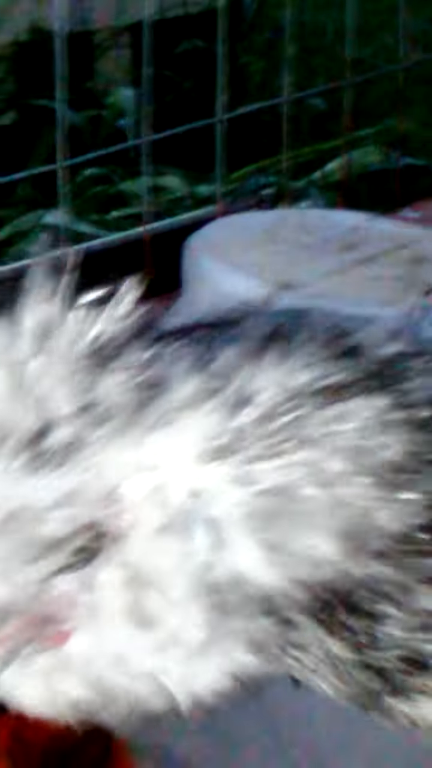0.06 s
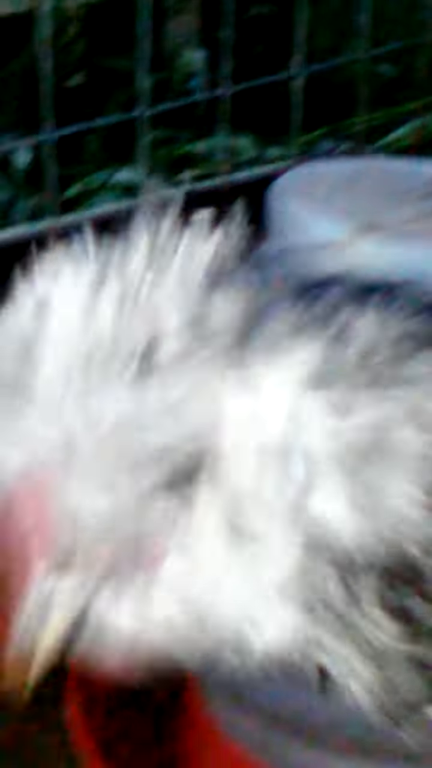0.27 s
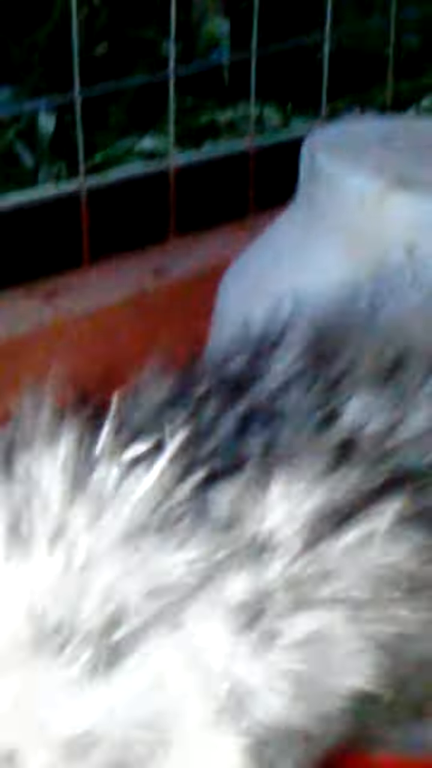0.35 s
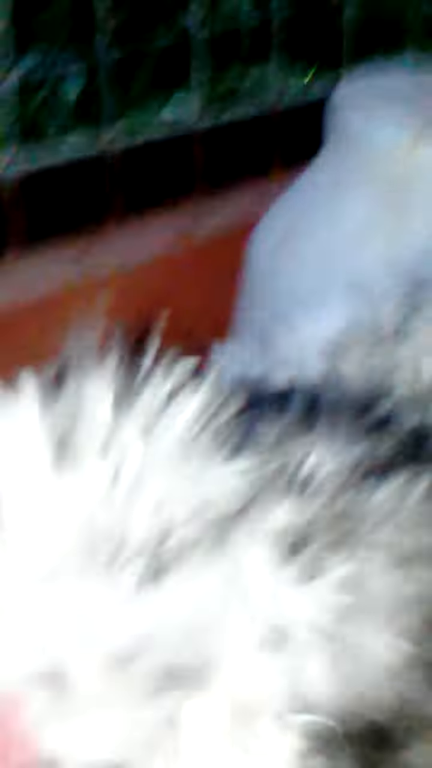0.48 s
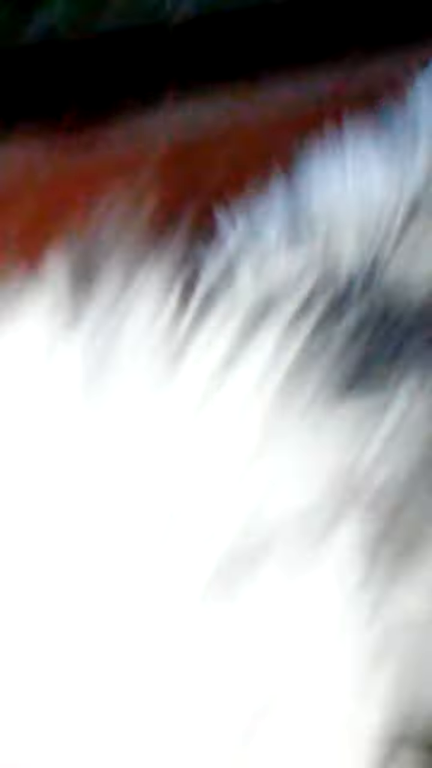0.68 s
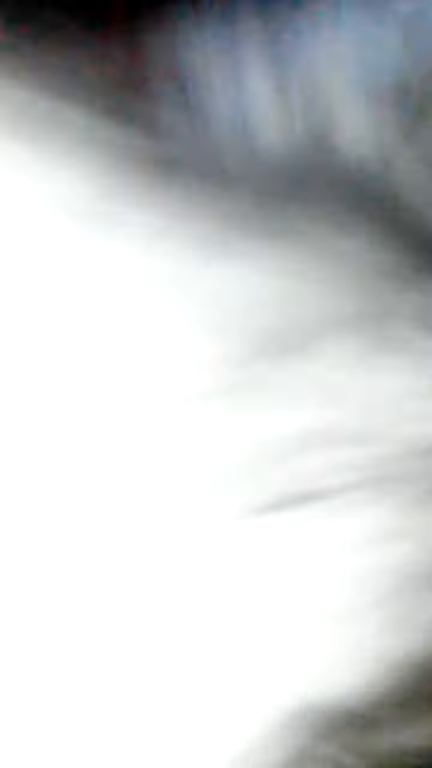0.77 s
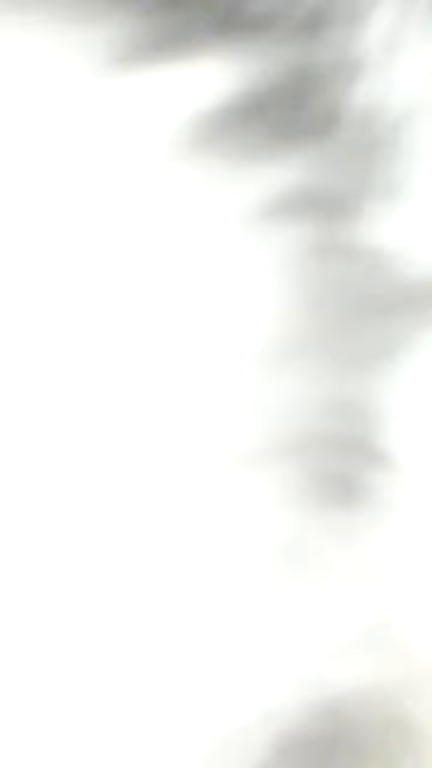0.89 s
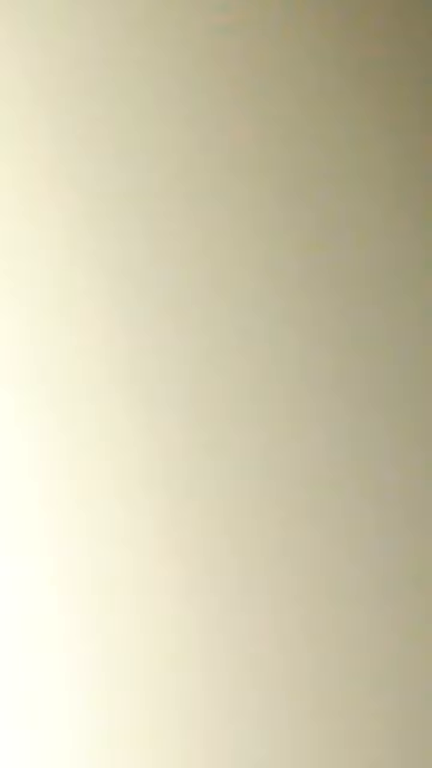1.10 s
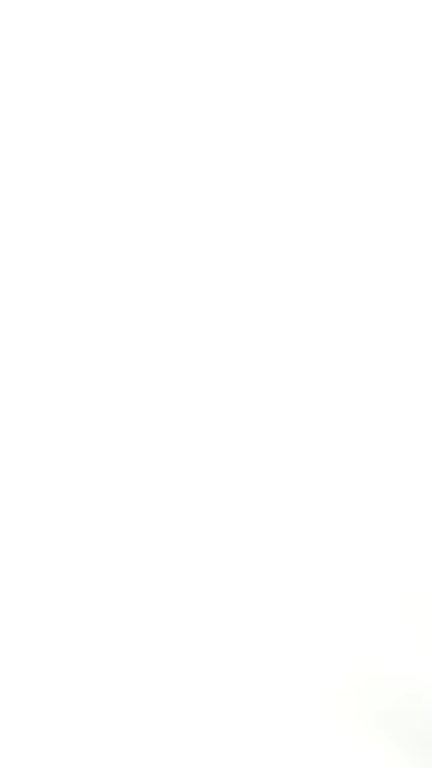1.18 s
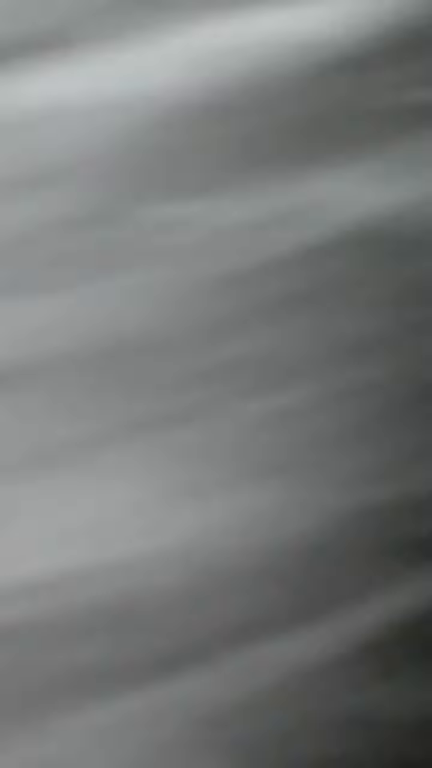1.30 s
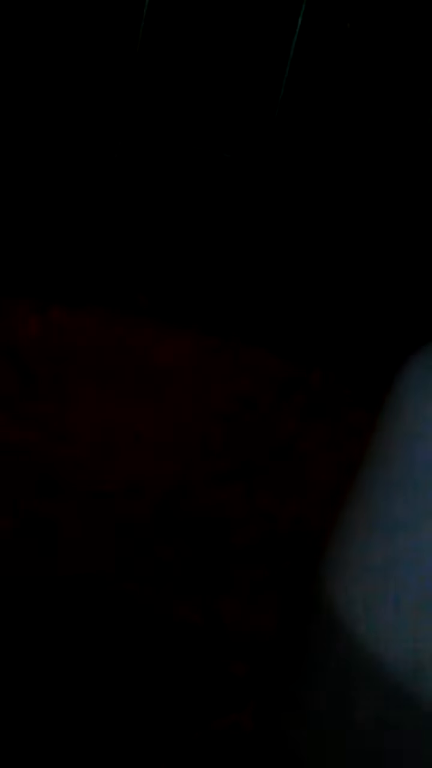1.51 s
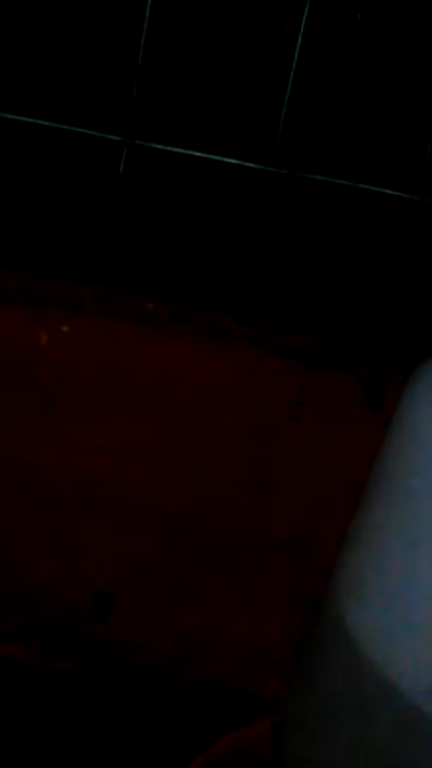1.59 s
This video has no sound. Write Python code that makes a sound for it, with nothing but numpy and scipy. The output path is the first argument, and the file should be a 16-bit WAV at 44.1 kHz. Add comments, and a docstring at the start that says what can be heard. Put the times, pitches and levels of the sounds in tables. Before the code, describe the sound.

Close hen clucks, low and brief, with soft crooning, small bird chirps, taps and a scrape

```python
"""Hen clucking in an outdoor pen

A hen clucks low and short close to a phone and ends on a harsher, higher call: pulses ring a throat.
Another hen croons in soft harmonic tones; small birds further off whistle falling chirps (gliding sines).
Feathers brush the phone (grainy noise) and scrape it once (ringing modes); beaks and feet tap (dull clicks).
A thin shimmer near 4 kHz, outdoor air and microphone hiss, all filtered noise, lie underneath.
"""
import sys
import numpy as np
from scipy import signal
from scipy.fft import rfft, irfft
from scipy.io import wavfile
from scipy.ndimage import uniform_filter1d

SR = 44100
rng = np.random.default_rng(int(sys.argv[2]) if len(sys.argv) > 2 else 0)


def boost_factor(decibels):
    """Convert a level in decibels to a linear amplitude factor."""
    exponent = np.asarray(decibels, float) / 20
    return 10 ** exponent


def put_to_file(sound):
    """Save the sound as 16-bit audio at rate SR, in the file named by the first command-line argument."""
    columns = np.atleast_2d(sound).T  # one column per channel
    safe = np.clip(columns, -1, 1)
    whole_steps = np.round(safe * 32767)
    wavfile.write(sys.argv[1], SR, whole_steps.astype(np.int16))


N = 72765


def line(table, col=1):
    """A table column joined by straight lines in time."""
    rows = np.array(table, float)
    return np.interp(np.arange(N) / SR, rows[:, 0], rows[:, col])


def inside(table, fade_s=0.0026):
    """1 between the first and last row, with short fades; 0 elsewhere."""
    t = np.arange(N) / SR
    to_edge_s = np.minimum(t - table[0][0], table[-1][0] - t)
    return np.clip(to_edge_s / fade_s, 0, 1)


def unit(x):
    """Scales to rms 1."""
    return x / np.sqrt(np.mean(x ** 2) + 1e-18)


def ring(x, hz, width_hz):
    """One resonance, gain near 1 at its centre."""
    return signal.lfilter(*signal.iirpeak(hz, hz / width_hz, SR), x)


def ring_twice(x, hz, width_hz):
    """The same resonance passed twice, for steeper skirts."""
    return ring(ring(x, hz, width_hz), hz, width_hz)


def coloured(points, lo_hz=20, hi_hz=2e4):
    """Noise shaped by (Hz, relative dB) points; rms 1 within lo_hz-hi_hz."""
    curve = np.array(points, float)
    hz = np.arange(N // 2 + 1) * SR / N + 1
    shape_db = np.interp(np.log(hz), np.log(curve[:, 0]), curve[:, 1])
    spectrum = rfft(rng.standard_normal(N)) * boost_factor(shape_db)
    in_band = irfft(spectrum * (hz > lo_hz) * (hz < hi_hz), N)
    return irfft(spectrum, N) / np.std(in_band)


def walk(rate_hz):
    """Slow random wander, rms 1."""
    size = int(SR / rate_hz)
    return unit(uniform_filter1d(uniform_filter1d(rng.standard_normal(N), size), size))


def tail(x, t60_s):
    """Scattered echoes dying away: convolution with decaying noise of unit energy."""
    t = np.arange(SR // 2) / SR
    echoes = rng.standard_normal(len(t)) * boost_factor(-60 * t / t60_s) * np.minimum(t / 0.0013, 1)
    return signal.fftconvolve(x, echoes / np.sqrt(np.sum(echoes ** 2)))[:N]


def late(x, delay_s):
    """The same sound, delay_s later."""
    return np.pad(x, (int(delay_s * SR), 0))[:N]


def whistle(rows):
    """A sine that follows a table of pitch and rms level."""
    phase = 2 * np.pi * np.cumsum(line(rows)) / SR
    return np.sqrt(2) * np.sin(phase) * boost_factor(line(rows, 2)) * inside(rows, 0.0027)


def outdoor_air():
    """Steady noise: the spectrum of outdoor air plus microphone hiss."""
    # Each row of both: frequency in Hz, relative density in dB.
    air_colour = [(15, -37), (25, -13), (189, -0.5), (458, -2), (646, -7.5), (893, -2), (1260, -10),
                  (1340, -7.5), (1430, -1.5), (1560, -10), (2020, -6.5), (2620, -7), (2800, -7.5),
                  (3180, -11.5), (3540, 1), (4030, -2.5), (4300, -28), (5590, -57.5), (9460, -120)]
    hiss_colour = [(2590, -54), (4400, -15.5), (4520, -24), (5270, -21.5), (6410, -2.5), (7080, -4),
                   (7960, -0.5), (8390, -5), (8890, -13), (10400, -14), (15600, -14.5)]
    air_db, hiss_db = -52.5, -63
    return boost_factor(air_db) * coloured(air_colour) + boost_factor(hiss_db) * coloured(hiss_colour)


def thin_shimmer():
    """Noise through a broad double resonance, its level wavering."""
    # Mean level. Each row: time in seconds, level in dB.
    level_rows = [(0.0, -70), (0.55, -75.5), (0.642, -52.5), (0.762, -70.5), (0.904, -47), (1.046, -55.5),
                  (1.12, -50.5), (1.268, -54), (1.65, -59)]
    centre_hz, width_hz = 3765, 1700
    band = unit(ring_twice(rng.standard_normal(N), centre_hz, width_hz))
    waver_db = 0.9 * walk(21)
    return band * boost_factor(line(level_rows) + waver_db)


def birds():
    """Falling whistles smeared by echoes among trees, and a few thin faraway notes without echo."""
    # One table a chirp. Each row: time in seconds, pitch in Hz, level in dB before flutter and echoes.
    chirps = [
        [(0.016,3050,-51),(.024,2900,-42.5),(.034,2370,-38.5),(.058,2206,-39.5)],
        [(.07,2570,-42),(.09,2530,-48),(.102,2300,-44),(.128,1896,-40)],
        [(.11,2722,-42),(.135,2450,-45),(.147,2270,-34),(.155,2150,-39)],
        [(.128,2963,-39),(.145,2885,-41.5),(.183,2482,-29.5),(.204,2030,-35)],
        [(.195,3260,-47.5),(.22,2700,-50),(.25,2240,-50.5)],
        [(.283,2910,-50),(.322,2950,-62)],
        [(.297,3400,-53),(.322,2950,-51),(.333,2693,-34),(.347,2390,-47.5)],
        [(.29,2386,-54),(.335,2246,-50)],
        [(.565,2950,-36.5),(.582,2840,-56),(.605,2400,-35),(.632,2125,-31.5),(.67,1895,-46.5)],
        [(.78,2950,-49),(.795,2704,-52.5),(.812,2360,-33),(.827,2020,-57)],
        [(.8,2835,-40),(.84,2602,-54),(.865,2310,-43)],
        [(.865,3350,-47),(.9,2785,-48),(.918,2260,-42),(.94,2190,-42.5)],
        [(.953,3026,-46),(.968,2556,-35.5),(.982,2343,-37.5),(1.0,2065,-44)],
        [(.96,3150,-52),(.99,2900,-48),(1.02,2280,-48)],
        [(1.13,3780,-60),(1.155,3050,-40),(1.172,2268,-30),(1.185,1903,-39.5),(1.2,2080,-64)],
        [(1.42,2590,-55.5),(1.47,2420,-44),(1.49,2270,-52),(1.5,2168,-47),(1.52,2440,-52)],
        [(1.583,2960,-51),(1.593,2453,-46.5),(1.63,2107,-41)],
    ]
    # One table a thin note. Each row: time in seconds, pitch in Hz, level in dB.
    notes = [
        [(0.11, 758, -48.5), (0.128, 823, -61), (0.154, 824, -46), (0.185, 824, -55.5)],
        [(0.243, 954, -51), (0.247, 943, -41), (0.273, 960, -46), (0.29, 947, -71)],
        [(0.594, 964, -49), (0.604, 1016, -36), (0.655, 1019, -61.5)],
    ]
    # Discrete echoes among trees. Each row: delay in seconds, level in dB.
    tree_echoes = [(.011, -7), (.024, -14.5), (.041, -19)]
    trees_t60_s, wet_db = 0.15, 0.5
    flutter_db = 2.6 * walk(160)
    out = sum(whistle(rows) for rows in chirps) * boost_factor(flutter_db)
    out = out + sum(boost_factor(db) * late(out, delay_s) for delay_s, db in tree_echoes)
    # the tail scatters the chirps with their discrete echoes
    out = out + boost_factor(wet_db) * tail(out, trees_t60_s)
    return out + sum(whistle(rows) for rows in notes)


def beak_and_foot_taps():
    """Impulses passed three times through one broad resonance make short dull clicks, with a little echo."""
    # Each row: start in seconds, peak before echo in dB, centre in Hz.
    tap_rows = [(.661, -32, 1140), (0.821, -35.5, 1120), (.845, -38.5, 1290), (.927, -28.5, 1065),
                (1.001, -32, 640), (1.07, -24.5, 1500), (1.237, -32, 1560), (1.258, -42, 1390),
                (1.323, -21.5, 1640), (1.518, -35, 1300), (1.577, -31, 1680)]
    echo_t60_s, echo_db = 0.064, -6.5
    out = 0
    for start_s, peak_db, hz in tap_rows:
        click = np.zeros(N)
        click[int(start_s * SR)] = 1
        for _ in range(3):
            click = ring(click, hz, 0.92 * hz)
        out = out + boost_factor(peak_db) * click / np.max(np.abs(click))
    return out + boost_factor(echo_db) * tail(out, echo_t60_s)


def feather_brush():
    """Feathers on the phone, and one tap's treble: coloured noise with a fast grainy level."""
    # Stretches of brushing that meet around 1.07-1.11 s, and a short treble puff with the tap near 1.32 s.
    # Each row: time in seconds, level in dB before grain.
    stretches = [
        [(0.99, -87), (1.002, -49), (1.024, -38.5), (1.034, -50), (1.068, -54.5), (1.072, -38)],
        [(1.108, -58.5), (1.124, -51.5), (1.148, -44), (1.178, -58), (1.27, -73), (1.28, -68)],
        [(1.315, -60), (1.325, -54), (1.34, -68)],
        [(1.068, -52), (1.09, -38), (1.11, -58.5)],
    ]
    # Each row: frequency in Hz, relative density in dB.
    brush_colour = [(29, -40), (50, 15), (275, 3), (638, -13), (1220, 13), (1750, -2), (2570, 13.5),
                    (3040, -8), (3690, 19), (4470, -10.5), (8340, 3.5), (13500, -2), (15600, -10)]
    grain_db = 1.8 * walk(220)
    strength = sum(boost_factor(line(rows)) * inside(rows) for rows in stretches)
    return coloured(brush_colour, lo_hz=5500, hi_hz=15000) * boost_factor(grain_db) * strength


def scrape():
    """Stick-slip: bursts of noise ring the modes of the phone's body."""
    # Each row: slip start in seconds, strength in dB.
    slips = [(1.0755, -21), (1.0825, -31), (1.087, -20), (1.0945, -21), (1.1005, -31)]
    # Each row: mode in Hz, nominal t60 in seconds, level in dB, contact time scale in ms.
    modes = [(3720, .007, 4, 3), (3360, 0.0041, 2, 3), (6520, 0.001, -1.5, 1.66), (8100, 0.0023, -23, 0.74),
             (11600, 0.0016, -5, 0.89), (14000, 0.0034, -22, 1.2), (1500, .003, -11.5, 2.9),
             (435, 0.0028, -8, 3.14), (120.4, 0.018, -23.5, 6.5)]
    t = np.arange(N) / SR
    body = 0
    for hz, t60_s, db, contact_ms in modes:
        push = 0
        for start_s, slip_db in slips:
            since = np.maximum(t - start_s, 0) * 1000 / contact_ms
            push = push + boost_factor(slip_db) * since * np.exp(-since ** 2)
        # a weak sine at the mode is added, so the bursts ring more evenly
        drive = rng.standard_normal(N) + 0.26 * np.cos(2 * np.pi * hz * t)
        width_hz = 3.2 / t60_s
        steady = ring_twice(drive, hz, width_hz)
        body = body + boost_factor(db) * ring_twice(push * drive, hz, width_hz) / np.std(steady)
    return body


def crooning_hen():
    """Closed-beak tones: a gliding fundamental and three weaker harmonics."""
    # One table a croon. Each row: time in seconds, pitch in Hz, level in dB before harmonic gains.
    croons = [
        [(0.1, 268.4, -67), (0.116, 279.6, -47), (0.13, 225, -58), (0.146, 206, -51.5), (0.19, 250, -74)],
        [(0.3, 288, -56.5), (0.326, 250.7, -51), (0.368, 259.6, -53), (0.392, 213.8, -52.5), (0.45, 246, -61)],
        [(0.57, 250, -75.5), (0.58, 247, -51.5), (0.598, 276, -50), (0.616, 296, -54.5), (0.65, 290, -73.5)],
        [(0.735, 251, -33), (0.761, 250, -50), (0.851, 250, -48), (0.863, 271, -48), (0.88, 250, -77)],
        [(0.97, 267.3, -48), (0.98, 281.5, -46), (1.002, 245.7, -46), (1.042, 254, -48), (1.07, 250, -51)],
    ]
    # Gains of harmonics 1-4 in dB.
    harmonics_db = [2.5, -7, 1, -8]
    # Lift of harmonics 2-4 in dB, one value a croon.
    upper_lifts_db = [-6, -1, -1, -9, -5.5]
    out = 0
    for rows, upper_db in zip(croons, upper_lifts_db):
        phase = 2 * np.pi * np.cumsum(line(rows)) / SR
        tone = 0
        for i, db in enumerate(harmonics_db):
            lift_db = upper_db if i > 0 else 0
            tone = tone + boost_factor(db + lift_db) * np.sin((i + 1) * phase)
        out = out + np.sqrt(2) * tone * boost_factor(line(rows, 2)) * inside(rows, 0.014)
    return out


def clucking_hen():
    """A pulse a cycle, with some breath, rings the throat resonances; the pen echoes it."""
    # One table a cluck. Each row: time in seconds, level in dB, mean pitch in Hz, upper throat in dB.
    clucks = [
        [(0.221, -30, 247.7, -1), (0.229, -21.5, 231.2, -6.5), (0.24, -33.5, 225.5, -27)],
        [(0.353, -30, 241.7, 4.5), (0.361, -11.5, 265.7, -1), (0.369, -11.5, 245, -15),
         (0.376, -57.5, 269.7, -2.5)],
        [(0.521, -32.5, 237.6, -3.5), (0.527, -13, 258.3, -5.5), (0.541, -13.5, 253.9, -4.5),
         (0.551, -11, 246.4, -6.5), (0.557, -28.5, 264.8, -18.5)],
        [(0.691, -18.5, 214, -10), (0.699, -14.5, 247.3, -6.5), (0.707, -13.5, 251.7, -14),
         (0.719, -15.5, 243.4, -23), (0.731, -16.5, 229, -17.5), (0.742, -48, 244, -8.5)],
        [(1.288, -29.5, 210, 2.5), (1.296, -28, 226.7, -1), (1.306, -26, 219, -6)],
    ]
    # The harsher, higher last call. Each row: as in the clucks.
    squawk = [(1.633, -36, 810, -4.5), (1.637, -30, 758, -12), (1.645, -24.5, 650, -16.5),
              (1.65, -16.5, 662, -22)]
    # Each row, one a call: throat frequency factor, width factor, chest in dB, top in dB, roughness 0-1.
    mouths = [(0.992, 1.18, -10, -26, 0.19), (1.091, 2.07, -14, -28.5, 0.2),
              (1.028, 1.05, -11.5, -25, 0.12), (0.994, 1.43, -8.5, -28, 0.08),
              (1.066, 1.2, -3.5, -25, 0.19), (0.74, 0.82, -11, -4, 0.7)]
    # Each row: resonance in Hz and width in Hz before the mouth factors, level in dB,
    # gain group (0 chest, 1 main, 2 upper, 3 top).
    throat = [(250, 450, -11.5, 0), (454, 173, 2.5, 0), (994.4, 206, 3, 1), (1305, 243, 2.5, 2),
              (1455, 184, 2, 2), (2240, 440, 5, 3), (2900, 320, 1.5, 3), (3600, 520, -6, 3)]
    pen_t60_s, pen_db = 0.13, -13.5
    out = 0
    for rows, (stretch, damp, chest_db, top_db, rough) in zip(clucks + [squawk], mouths):
        pitch_hz = line(rows, 2)
        jitter = 1 + 0.2 * rough * walk(150)
        phase = 2 * np.pi * np.cumsum(pitch_hz * jitter) / SR
        phase = phase - phase[int(rows[0][0] * SR)] - 1.5  # each call starts 1.5 rad ahead of a pulse
        pulses = sum(np.cos(k * phase) for k in range(1, int(4500 / pitch_hz.max())))
        breath = 3 * rough * rng.standard_normal(N) * (1 + np.cos(phase))  # strongest at the pulse
        source = pulses + breath
        group_gains = [boost_factor(chest_db), 1, boost_factor(line(rows, 3)), boost_factor(top_db)]
        voice = 0
        for i, (hz, width_hz, db, group) in enumerate(throat):
            rung = ring_twice(source, hz * stretch, width_hz * damp)
            voice = voice + (-1) ** i * boost_factor(db) * group_gains[group] * rung  # alternating polarity
        out = out + unit(voice) * inside(rows, 0.00034) * boost_factor(line(rows))
    return out + boost_factor(pen_db) * tail(out, pen_t60_s)


def scene():
    """Voices, taps and shimmer lose their top in the microphone; everything loses deep bass."""
    top_hz, bass_cut_hz = 3843, 91  # the microphone is nearly deaf to them just above top_hz
    low = thin_shimmer() + birds() + beak_and_foot_taps() + crooning_hen() + clucking_hen()
    low = signal.sosfilt(signal.ellip(6, 1, 50, top_hz, fs=SR, output="sos"), low)
    mix = low + outdoor_air() + feather_brush() + scrape()
    mix = signal.sosfilt(signal.butter(2, bass_cut_hz, "high", fs=SR, output="sos"), mix)
    return mix[None]


def roll_off(x):
    """The treble ends steeply here."""
    return signal.sosfilt(signal.butter(12, 15730, fs=SR, output="sos"), x)


def record(dry):
    """The finished mix as the phone stores it."""
    return roll_off(dry)


dry = scene()
out = record(dry)
put_to_file(out)
```